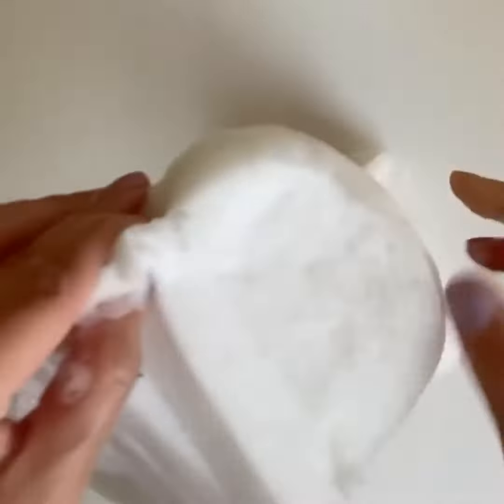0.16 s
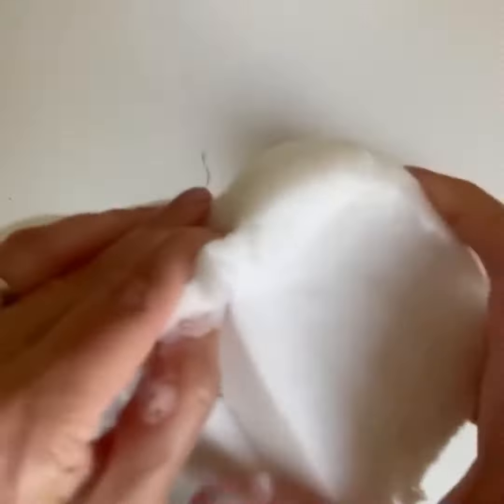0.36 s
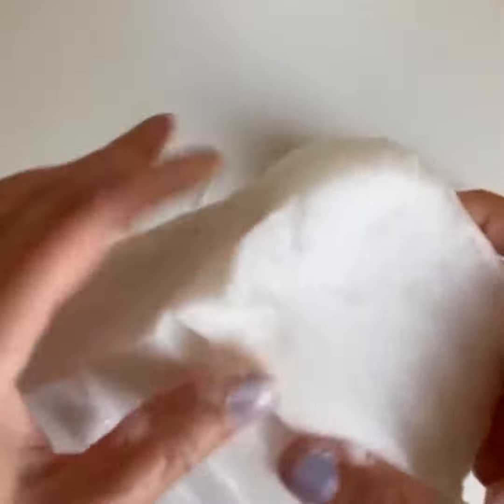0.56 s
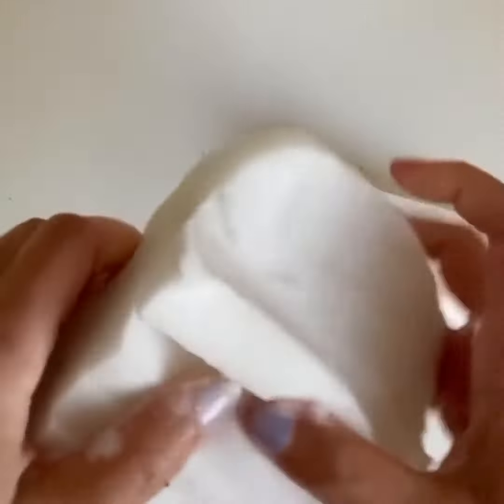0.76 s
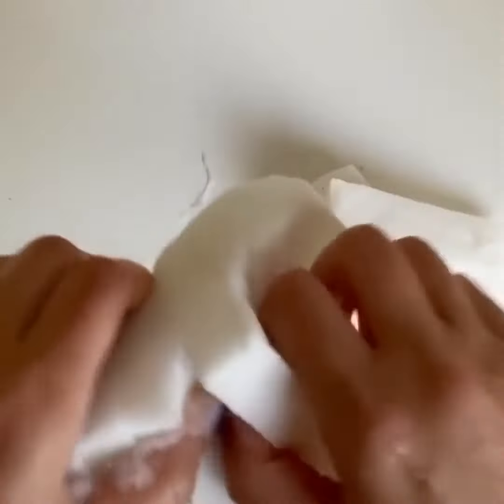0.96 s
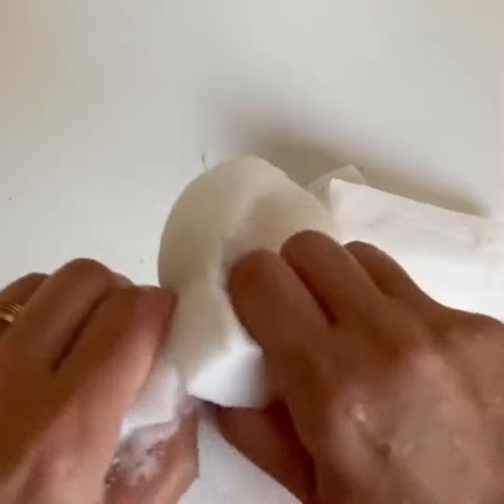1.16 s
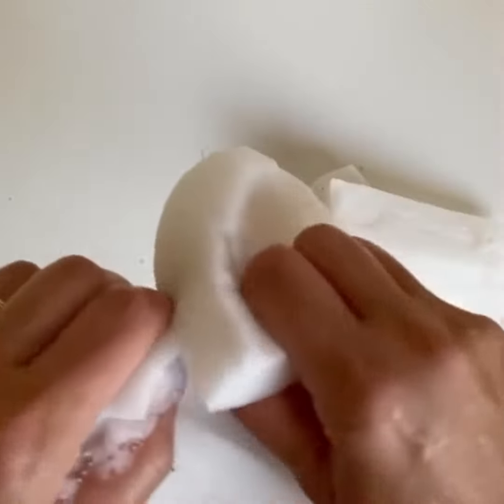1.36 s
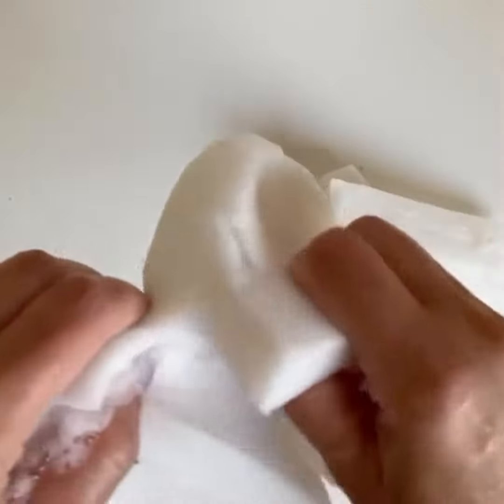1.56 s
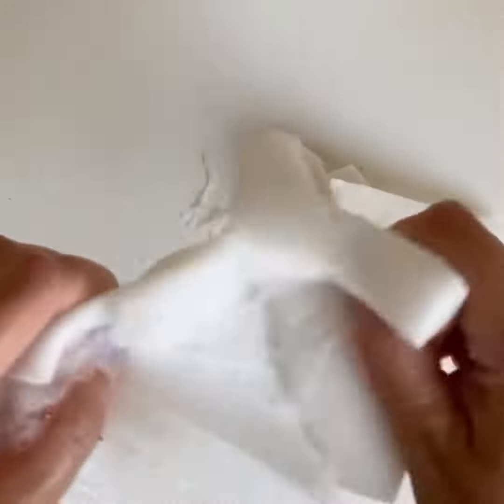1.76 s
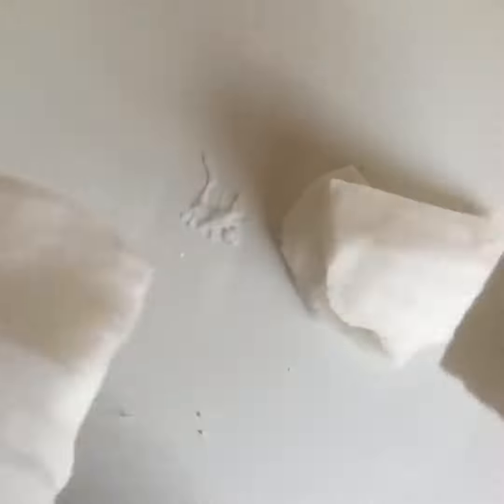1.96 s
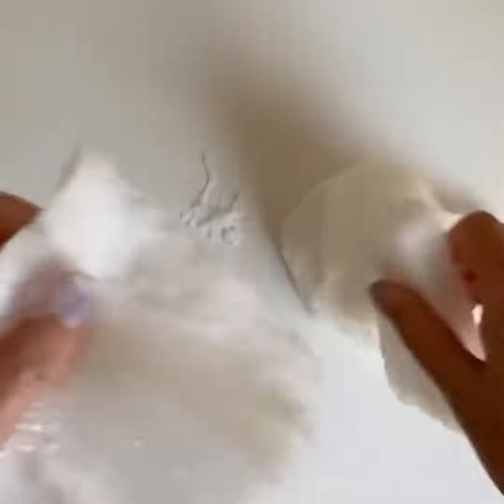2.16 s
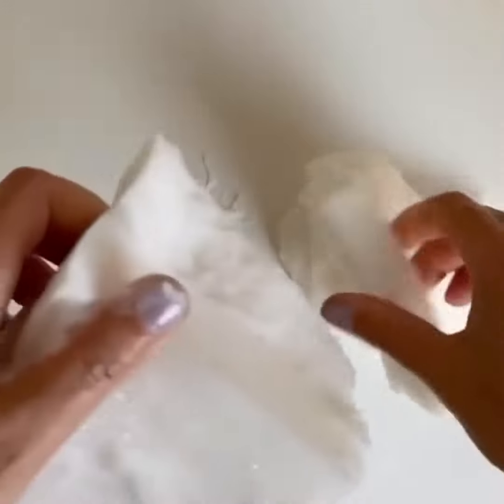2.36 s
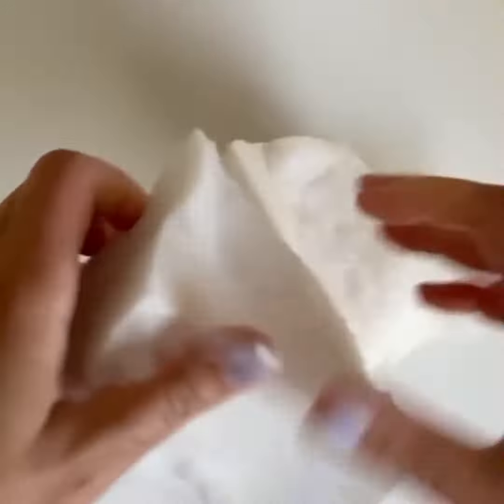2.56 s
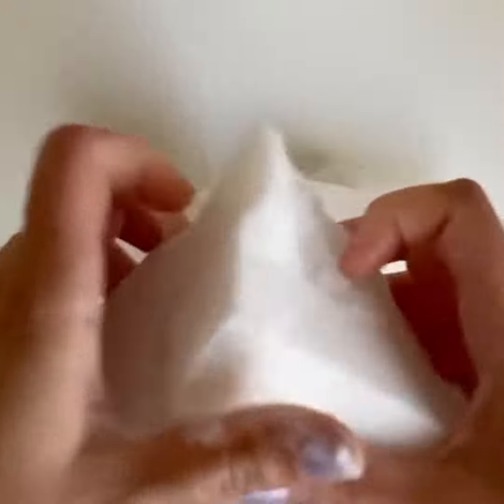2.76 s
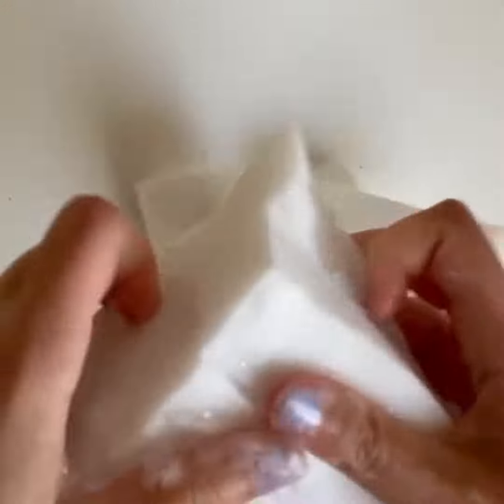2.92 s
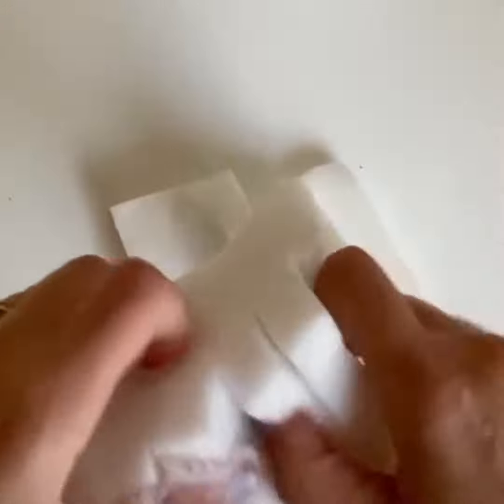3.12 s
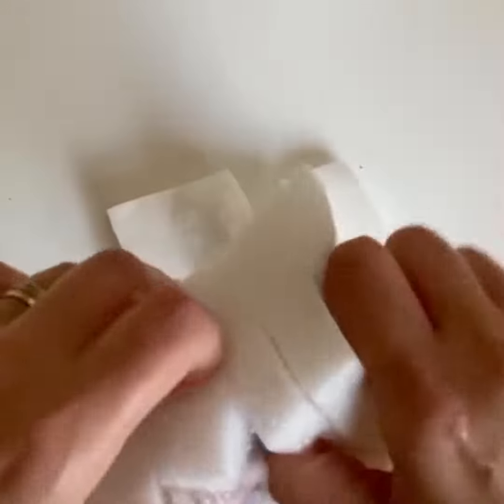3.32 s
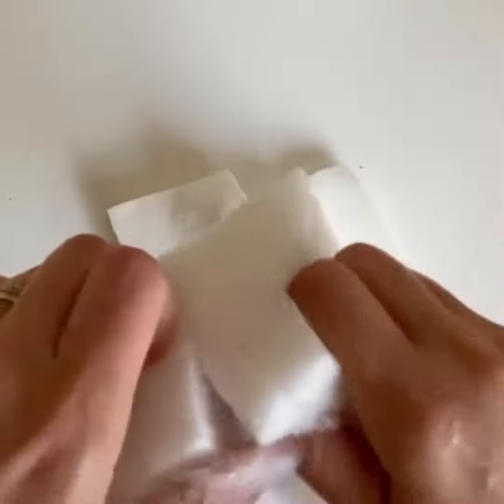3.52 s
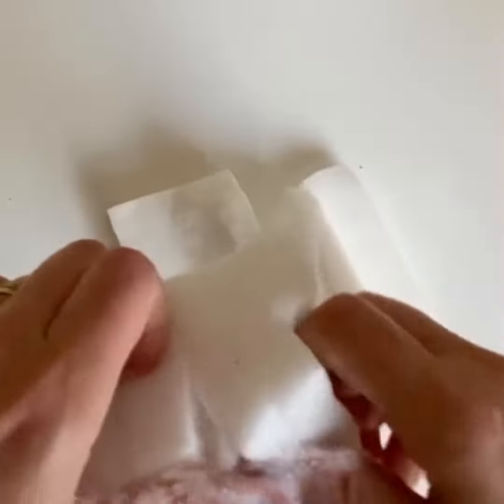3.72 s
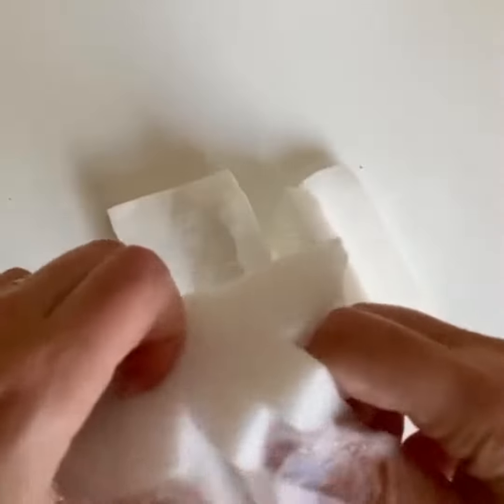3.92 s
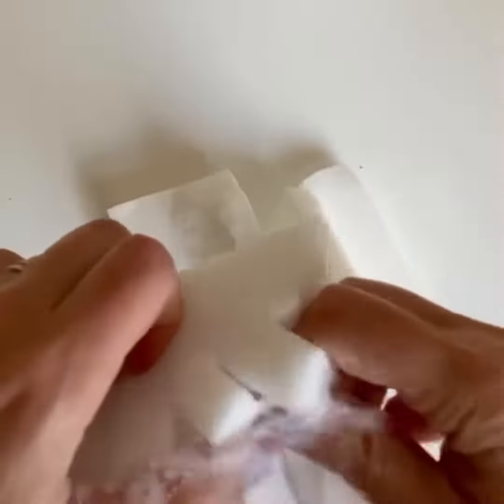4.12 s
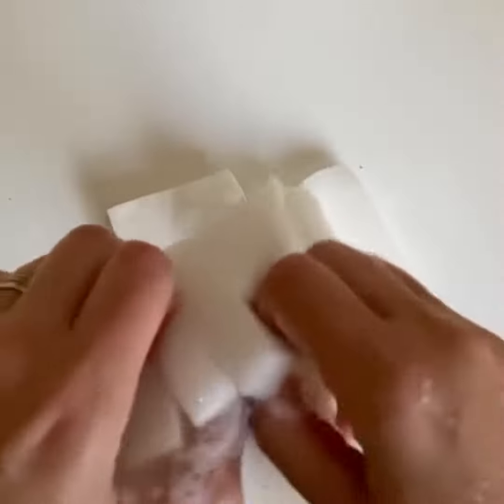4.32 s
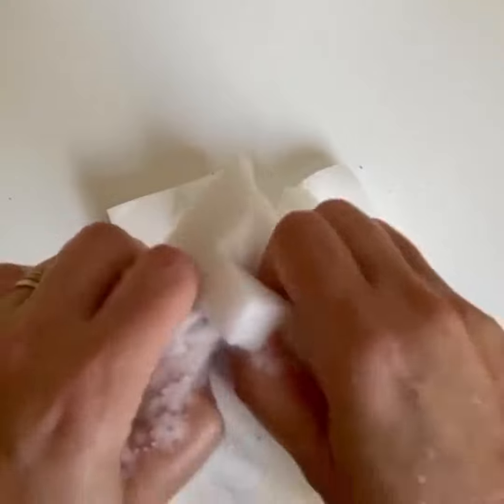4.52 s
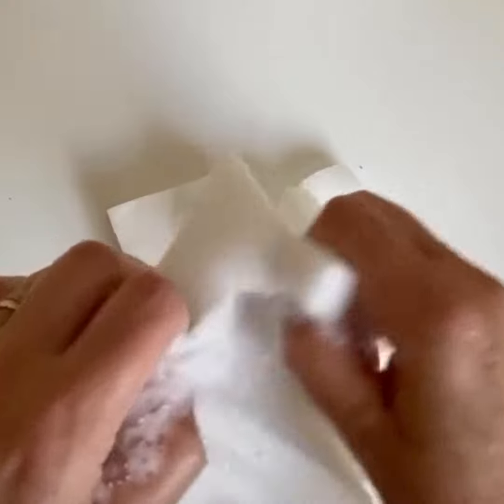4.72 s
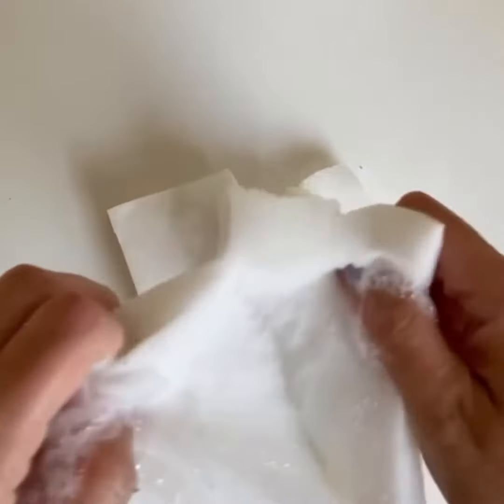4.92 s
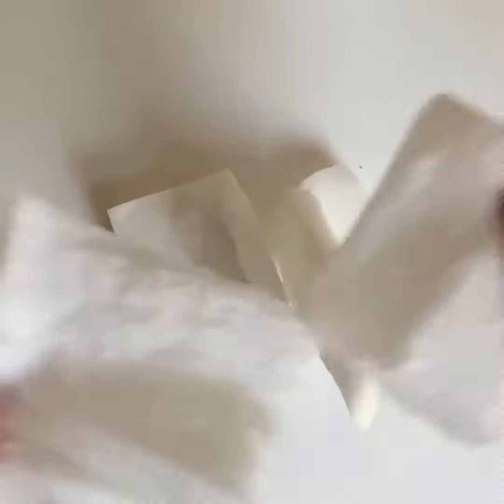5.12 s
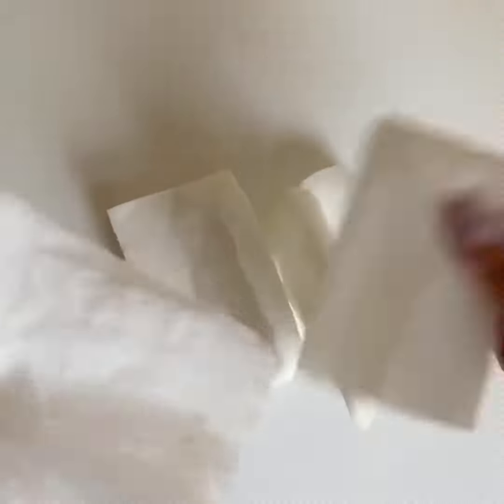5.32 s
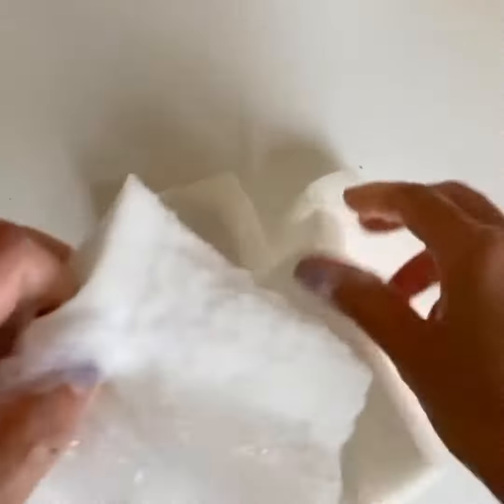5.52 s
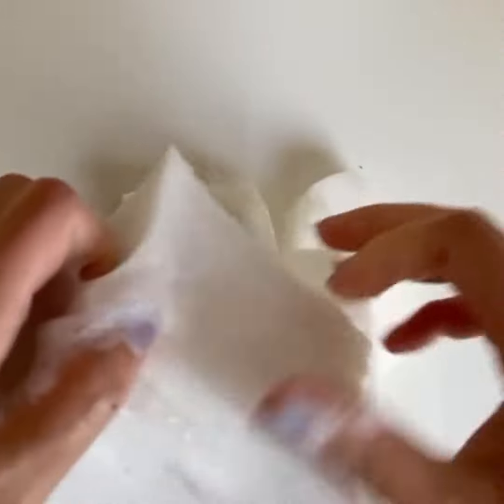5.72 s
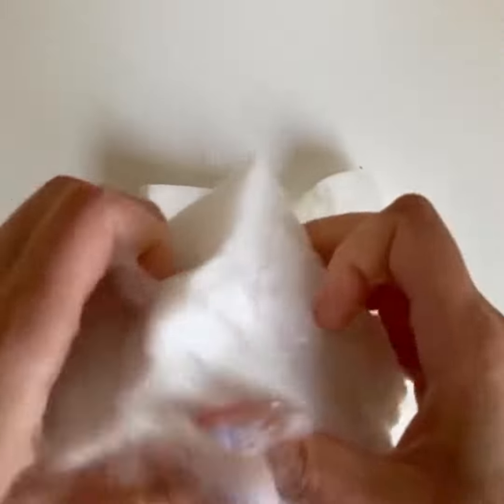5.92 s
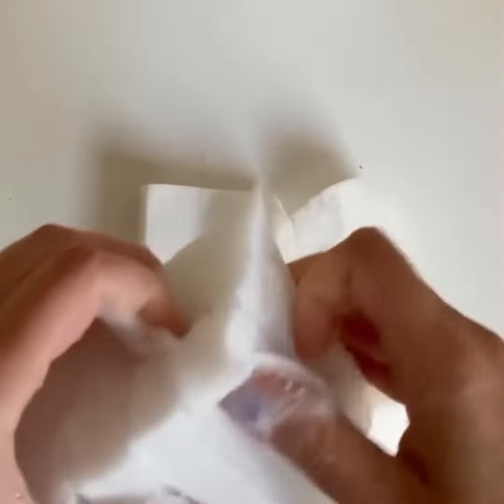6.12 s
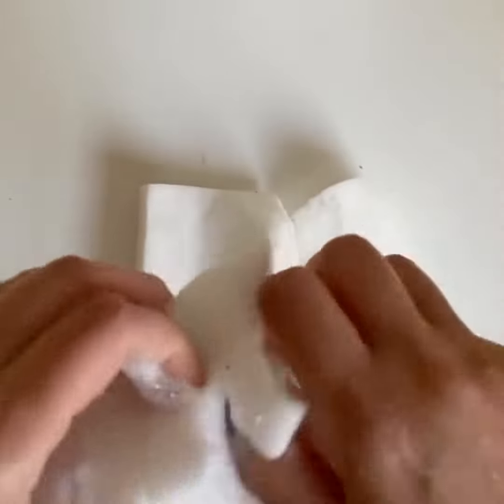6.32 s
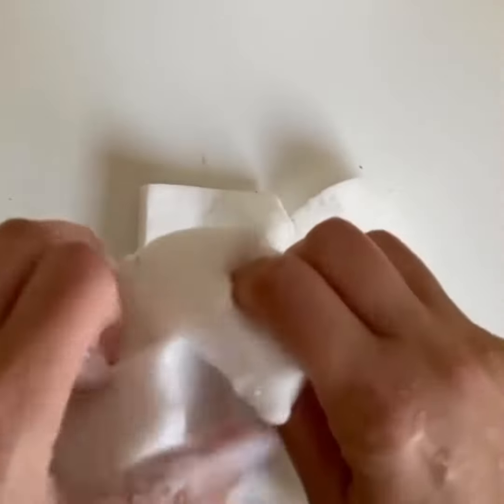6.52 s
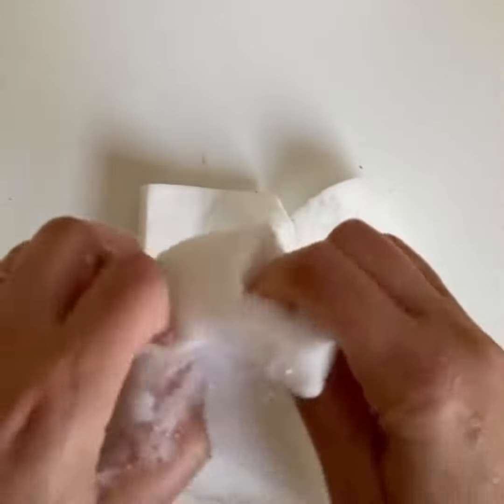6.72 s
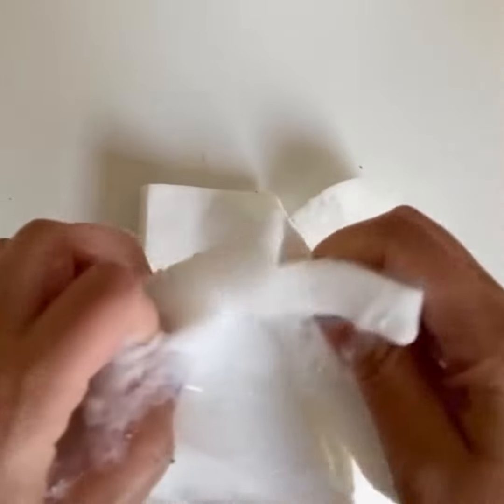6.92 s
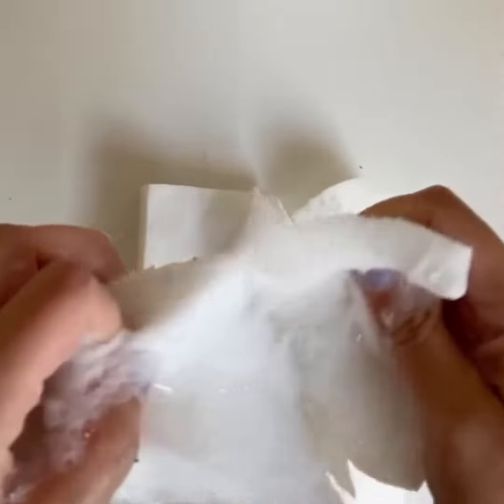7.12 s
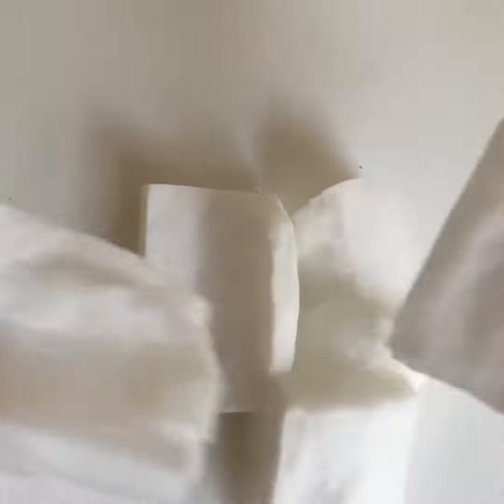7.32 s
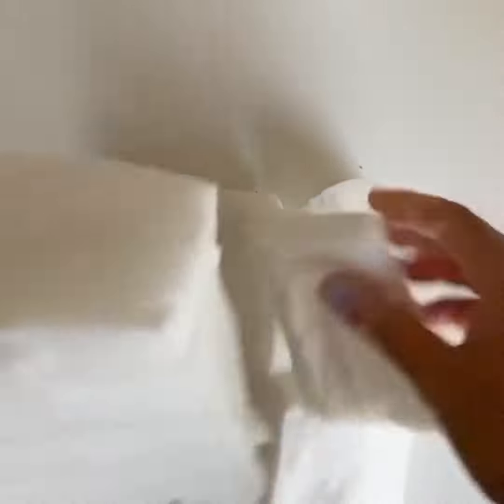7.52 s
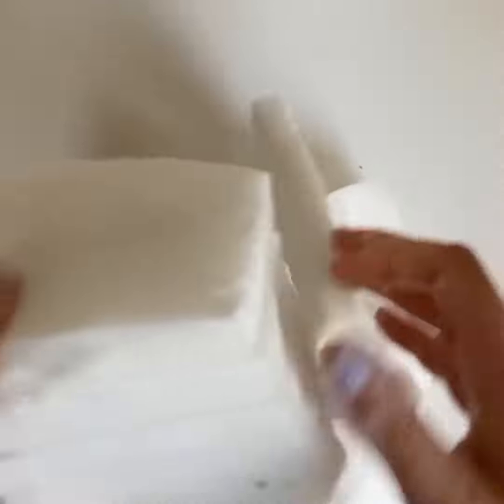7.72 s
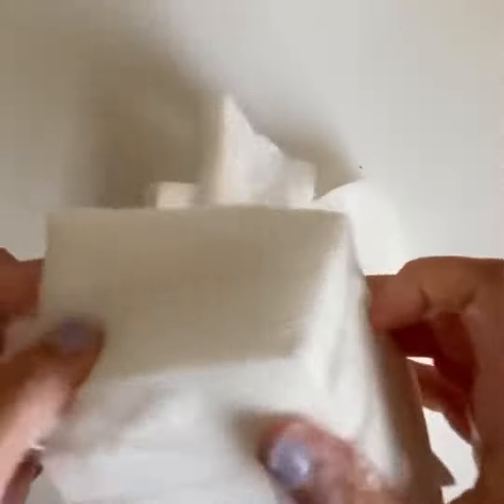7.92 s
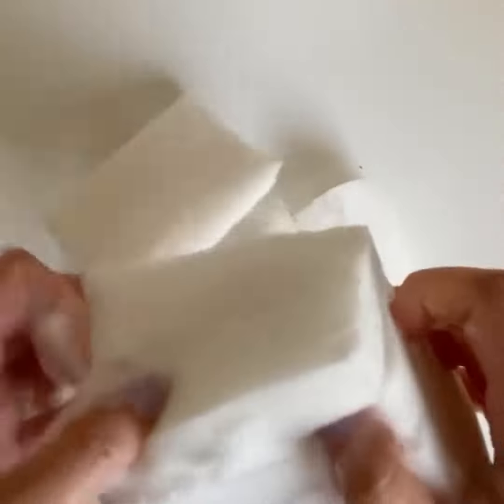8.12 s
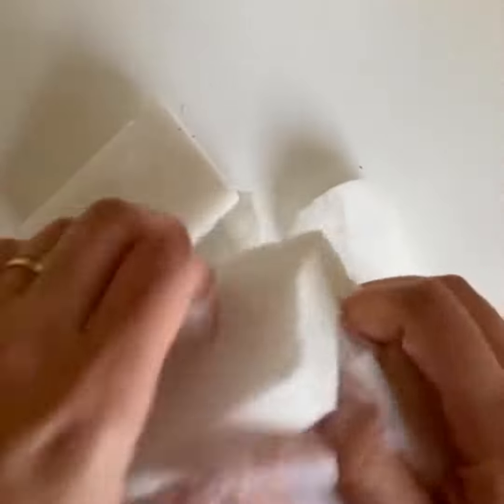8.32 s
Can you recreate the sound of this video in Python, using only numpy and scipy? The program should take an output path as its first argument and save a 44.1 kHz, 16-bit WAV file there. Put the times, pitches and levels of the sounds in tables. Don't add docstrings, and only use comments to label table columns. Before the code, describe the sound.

Close, crunchy handling of a soapy sponge in a quiet room, with three straining pulls that each end in a fast tearing snap.

```python
import sys
import numpy as np
from scipy import signal
from scipy.fft import rfft, irfft, next_fast_len
from scipy.io import wavfile
from scipy.ndimage import uniform_filter1d, map_coordinates

SR = 44100
rng = np.random.default_rng(int(sys.argv[2]) if len(sys.argv) > 2 else 0)


def volts(x):
    e = np.asarray(x, float) / 20
    return 10 ** e


def master_out(mix):
    frames = np.transpose(np.atleast_2d(mix))
    ceiling = np.clip(frames, -1, 1)
    pcm = np.round(ceiling * 32767).astype(np.int16)
    wavfile.write(sys.argv[1], SR, pcm)


N = 369116
STEP_S = .001

# start t/s, peak t/s, parting t/s, peak level/dB, wetness/dB
RIP_EVENTS = [
    (1.612, 1.624, 1.662, -15.5, 4),
    (4.837, 4.896, 4.909, -17, 4),
    (6.991, 7.059, 7.06, -13.5, -0.5),
]


def unit(x):
    return x / np.sqrt(np.mean(x ** 2) + 1e-20)


def along(points, hz):
    f, v = np.transpose(points)
    return np.interp(np.log(hz + 1), np.log(f + 1), v)


def wobble(rate):
    knots = rng.standard_normal(int(N * rate / SR) + 4)
    return map_coordinates(knots, [np.arange(N) * rate / SR])


def filtered(x, response):
    m = 2 * next_fast_len(N // 2 + 4096)
    return irfft(rfft(x, m) * response(np.fft.rfftfreq(m, 1 / SR)), m)[..., :N]


def clock():
    return np.arange(0, N / SR, STEP_S)


def per_sample(control):
    return np.interp(np.arange(N) / SR, clock(), control)


def bumps(rows, height):
    t = clock()
    return per_sample(sum(height(v) * np.exp(-((t - s) / half) ** 4) for s, v, half in rows))


def curve(rows):
    s, effort_db, wet_db = np.transpose(rows)
    effort = np.interp(clock(), s, effort_db, left=-120, right=-120)
    return effort, np.interp(clock(), s, wet_db)


def swell(s, db, rise, fade, wet_db, hold=0):
    blunt = 0.22
    t = clock() - s
    before = -t / max(rise, STEP_S)
    after = (t - hold) / max(fade, STEP_S)
    away = np.maximum(np.maximum(before, after), 0)
    return db - 10 * (np.hypot(away, blunt) - blunt), wet_db + 0 * t


def room():
    # f/Hz, level/dB per Hz
    rumble_colour = [(15, -50), (30, -14.5), (45, -8.5), (65, 7), (85, -2), (130, -5.5), (220, -43.5)]
    hiss_colour = [(80, -16), (150, 4.5), (330, 2), (600, -4.5), (2000, -16), (3400, -29), (6000, -59),
                   (9000, -45), (12500, -48), (16000, -34.5)]
    # t/s, change/dB, half length/s
    leans = [(.25, 5.5, .08), (.44, 4.5, 0.035), (1.1, 2.5, .1), (2.25, -3, 0.13), (2.6, 6, 0.052),
             (4.2, 1.5, 0.035), (5.24, 3.5, 0.053), (5.48, 4.5, .08), (5.83, 5, 0.046), (7.3, -5, 0.049),
             (7.5, -5.5, 0.052), (8.3, 3, 0.13)]
    # t/s, change/dB, half length/s
    lulls = [
        (.04, -3.5, 0.064),
        (2.28, -1.5, 0.076),
        (5.4, 0.5, 0.084),
        (7.48, -3, 0.095),
    ]
    gust_over_rip_db = [-10, -24, -21.5]
    gusts = sum(volts(db + gust_db) for (db, _), gust_db in zip(rips(), gust_over_rip_db))
    gusts = uniform_filter1d(gusts, size=40)
    hum = unit(filtered(rng.standard_normal((2, N)), lambda hz: volts(along(rumble_colour, hz))))
    hiss = unit(filtered(rng.standard_normal((2, N)), lambda hz: volts(along(hiss_colour, hz))))
    stirred = filtered(per_sample(gusts) * hum, lambda hz: hz ** 4 / (hz ** 4 + 49.0 ** 4))
    hum_gain = volts(-51.5 + bumps(leans, float) + wobble(5))
    hiss_gain = volts(bumps(lulls, float) - 56.5 + 0.77 * wobble(6.1))
    return hum_gain * hum + stirred + hiss_gain * hiss


def seeping():
    # t/s, effort level/dB, wetness/dB
    seep = [(0, -61, 2), (.09, -75, -1), (.12, -54.5, 0.5), (.82, -58.5, 3.5), (1.74, -50.5, 1),
            (2.1, -57.5, 2), (2.23, -62.5, 3), (2.44, -59, 5), (2.52, -60, -19), (3.15, -58, -3),
            (3.46, -52.5, -0.5), (4.15, -61, 3), (5.28, -53, 4.5), (5.32, -67, -3), (5.53, -60.5, 1.5),
            (7.16, -53, 6), (7.36, -63.5, 3), (8.1, -50.5, 2)]
    return [curve(seep)]


def rings(events, attack, crack):
    out, t = np.zeros(N + SR), np.arange(SR // 4) / SR
    for s, db, hz, t60 in events:
        swing = np.sin(2 * np.pi * hz * t) + crack * rng.standard_normal(len(t))
        envelope = volts(db - 60 * t / max(t60, .002)) * (1 - np.exp(-t / attack))
        out[round(s * SR):][:len(t)] += envelope * swing
    return out[:N]


def loud_snaps():
    # t/s, peak level/dB, pitch f/Hz
    snaps = [(0.105, -43, 993), (0.797, -32.5, 1420), (0.996, -28, 2400), (1.486, -15.5, 1880),
             (1.539, -25, 2070), (1.616, -9, 2570), (1.63, -3.5, 3060), (2.451, -42, 1380),
             (2.564, -43, 2000), (2.677, -26.5, 1100), (2.69, -29, 1430), (3.062, -35, 1940),
             (3.084, -29, 2420), (3.177, -42, 1220), (4.354, -22, 2880), (4.489, -16.5, 3170),
             (4.57, -10, 1140), (4.66, -15, 1890), (4.751, -20, 1900), (4.847, -15.5, 3310),
             (5.453, -51, 900), (5.911, -28, 1190), (5.981, -27.5, 2410), (6.112, -27.5, 1100),
             (6.554, -19.5, 5700), (6.869, -11, 2360), (6.996, -7, 2260), (7.554, -44, 5470)]
    t60_s = 0.0095
    return volts(3.5) * rings([(*row, t60_s) for row in snaps], attack=0.00046, crack=0.23)


def film_pops():
    # t/s, effort level/dB
    pops = [(0.108, -49), (.797, -52.5), (2.454, -39), (2.565, -44), (3.063, -46), (4.662, -24),
            (5.409, -51), (5.424, -57), (5.454, -49.5), (5.522, -56), (6.115, -39), (7.554, -52)]
    return [swell(s, db, rise=0.00073, fade=0.0019, wet_db=1) for s, db in pops]


def pinches():
    # t/s, effort level/dB, time to fade 10 dB/s, wetness/dB
    grips = [(.12, -54, .06, 5), (2.169, -58, 0, 13), (2.365, -48, -0.1, -2), (2.46, -47, 0.07, -2),
             (2.686, -41.5, 0.06, -1), (2.925, -39.5, 0.01, 0.5), (3.34, -44, -0.06, -15),
             (3.56, -54, 0.3, -0.5), (7.345, -51.5, -0.1, 7), (2.81, -47, 0.2, -2), (4.199, -41.5, .03, -1),
             (5.08, -52.5, 0.1, -13), (5.275, -54.5, 0.1, -8), (5.74, -50.5, 0.85, -7),
             (7.42, -52, -0.33, -12), (7.56, -64, 3, 6)]
    return [swell(s, db, 0.011, fade, wet) for s, db, fade, wet in grips]


def held_squeezes():
    squeezes = [(0.238, 0.308, -49, 2.5), (0.352, 0.483, -57.5, 2), (0.54, .66, -48, -3),
                (0.71, 0.78, -46.5, -1.5), (0.91, 0.971, -53, -1), (2.563, 2.656, -48.5, -0.5),
                (2.77, 2.934, -47, 0), (2.948, 3.01, -46, -2), (3.084, 3.102, -44.5, -4),
                (3.2, 3.259, -41.5, -0.5), (3.364, 3.416, -52.5, 3), (3.66, 3.767, -49, 0.5),
                (3.867, 3.882, -44, -4), (3.95, 4.122, -48, -1), (4.21, 4.31, -47, 0.5),
                (5.61, 5.659, -45, -2.5), (5.802, 5.868, -43.5, 0), (5.905, 5.974, -45.5, -1.5),
                (5.991, 6.01, -32, -7), (6.127, 6.244, -37, -4), (6.26, 6.453, -43.5, -7.5),
                (7.232, 7.265, -47, -2.5), (7.732, 7.745, -50.5, 4), (7.825, 7.942, -42.5, -1.5),
                (7.978, 7.992, -47.5, 2), (8.141, 8.238, -43, -2), (8.297, 8.37, -39, -4)]
    press_s, let_go_s = 0.022, 0.022
    return [swell(start, db, press_s, let_go_s, wet, hold=end - start)
            for start, end, db, wet in squeezes]


def finger_rubs():
    # t/s, level/dB, half length/s
    rubs = [
        (.6, -60, 0.06),
        (3.255, -76, 0.013),
        (3.33, -65, 0.013),
        (7.43, -68.5, 0.0064),
        (7.56, -55, 0.0067),
        (7.73, -63, 0.013),
        (7.93, -71, 0.071),
    ]
    return bumps(rubs, volts)


def block_thumps():
    # t/s, peak level/dB, pitch f/Hz, time to fall 60 dB/s
    thumps = [(0.729, -37.5, 131, 0.098), (1.615, -18, 388, 0.077), (1.66, -30.5, 133, 0.077),
              (4.548, -41, 390, 0.098), (4.849, -17.5, 282, 0.064), (4.93, -44, 370, 0.078),
              (5.995, -38, 389, 0.19), (6.215, -38, 305, 0.16), (6.997, -33, 395, 0.036),
              (7.048, -43, 398, 0.067), (8.149, -33, 108, 0.073),
              (4.847, -22.5, 171, 0.049),
    ]
    return volts(3.0) * rings(thumps, attack=0.0023, crack=0)


def crack_pulls():
    # t/s, effort level/dB, wetness/dB
    pulls = [
        [(.99, -58, 4.5), (1.01, -37, -1.5), (1.112, -41, -6.5), (1.164, -41, 0), (1.25, -35, -0.5),
         (1.438, -36, 1), (1.538, -21, 0), (1.58, -27.5, 4), (1.612, -29.5, 2)],
        [(4.335, -50, -2), (4.357, -37.5, -6), (4.458, -33, 1.5), (4.564, -21.5, -1.5), (4.65, -36, 2),
         (4.66, -25, -3.5), (4.702, -29, 1), (4.78, -29.5, 2), (4.845, -32.5, 5)],
        [(6.4, -51.5, 6.5), (6.506, -34.5, 2), (6.57, -33, 3), (6.58, -27, 1), (6.654, -31, 2.5),
         (6.864, -27, 2.5), (6.954, -28.5, 2), (6.992, -24.5, 2)],
    ]
    return [curve(pull) for pull in pulls]


def rips():
    start_under_peak_db, sag_db_per_s = [-10, -11, -7.5], 69
    fall_db_per_s, parted_db = [808, 347, 712], -37
    for (start, peak, parting, db, wet_db), start_db, fall in zip(RIP_EVENTS, start_under_peak_db, fall_db_per_s):
        sagged_db = db - sag_db_per_s * (parting - peak)
        yield curve([(start, db + start_db, wet_db), (peak, db, wet_db), (parting, sagged_db, wet_db),
                     (parting - parted_db / fall, sagged_db + parted_db, wet_db)])


def springing_back():
    under_rip_db = [-26, -13, -26.5]
    return [swell(parting + 0.023, db + under_db, rise=0.022, fade=0.043, wet_db=-4.5)
            for (_, _, parting, db, _), under_db in zip(RIP_EVENTS, under_rip_db)]


def cell_power(effort_db, wet_db, big_db):
    big = big_db + 0.076 * wet_db
    main = 0 * wet_db
    fine = -4.5 + wet_db
    finest = -9 + 1.48 * wet_db
    return volts(2 * (effort_db + np.array([big, main, fine, finest])))


def gestures():
    big_over_main = {"seep": -10.5, "hands": -9, "pull": -12.5, "rip": -8, "settle": 2.5}
    hands = pinches() + held_squeezes() + film_pops()
    kinds = {"seep": seeping(), "hands": hands, "rip": rips(), "settle": springing_back()}
    power = 0
    for kind, group in kinds.items():
        for effort_db, wet_db in group:
            power = power + cell_power(effort_db, wet_db, big_over_main[kind])
    crack_width_db = [2, -1, -2.5]
    for (effort_db, wet_db), width_db in zip(crack_pulls(), crack_width_db):
        big_db = big_over_main["pull"] + width_db + 0.41 * (effort_db + 30)
        power = power + cell_power(effort_db, wet_db, big_db)
    return np.array([per_sample(gain) for gain in np.sqrt(power)]) + finger_rubs()


def slips(rate, settle):
    gives = (rng.random(N) < rate / SR) * rng.exponential(size=N)
    slip = signal.lfilter([1], [1, -np.exp(-1 / (settle * SR))], gives)
    return unit(slip - slip.mean())


def crackle(spectrum, rate, spread_db, hiss, patchy_db):
    chance = rng.random((2, N))
    size = rng.exponential(size=(2, N))
    noise = rng.standard_normal((2, N))
    breaks = (chance < rate / SR) * volts(spread_db * np.minimum(size, 4)) * np.sign(noise[::-1])
    hz, _, z = signal.stft(unit(breaks) + hiss * noise, SR, nperseg=512)
    field = uniform_filter1d(rng.standard_normal(z.shape[1:]), size=5, axis=0)
    field = uniform_filter1d(field, size=7, axis=1)
    coloured = z * volts(patchy_db * unit(field) + along(spectrum, hz)[:, None])
    return unit(signal.istft(coloured, nperseg=512)[1][:, :N])


def tearing():
    # f/Hz, level/dB per Hz
    big_colour = [(90, -7), (200, -4.5), (380, 1.5), (550, -3), (800, 0.5), (1100, -1), (1600, -41.5)]
    main_colour = [(600, -41), (900, -6.5), (1200, -2.5), (1700, -1), (2500, -1.5), (2850, -4.5),
                   (3600, -8.5), (4400, -25.5), (5200, -56)]
    fine_colour = [(3000, -56), (3800, -9), (5000, -6), (6200, -5), (7200, -5.5), (8000, 0.5), (9000, -63)]
    finest_colour = [(7000, -48), (8000, -4), (8900, -0.5), (10200, -4), (12000, -8.5), (13200, -6.5),
                     (14200, -18), (15600, 0), (16200, -62)]
    big, main, fine, finest = gestures()
    jerk = 0.8 * slips(45, settle=0.018) + 0.87 * slips(200, settle=0.0039)
    body = volts(1.72 * jerk + 0.57 * wobble(25))
    body = body * crackle(big_colour, 750, spread_db=2.0, hiss=0.71, patchy_db=1.0)
    cells = volts(-1.7 + 0.4 * jerk + 1.43 * wobble(40))
    cells = cells * crackle(main_colour, 2670, spread_db=3.5, hiss=0.69, patchy_db=0.38)
    fizz = volts(0.5 + 0.85 * jerk + 0.76 * wobble(40))
    fizz = fizz * crackle(fine_colour, 4000, spread_db=2.5, hiss=0.77, patchy_db=1.24)
    air = volts(3 + 1.1 * jerk + wobble(40))
    air = air * crackle(finest_colour, 6000, spread_db=2.5, hiss=1.0, patchy_db=1.6)
    return big * body + main * cells + fine * fizz + finest * air


def echoes(hz, wet_db, t60):
    t = np.arange(8000) / SR
    tail = rng.standard_normal(len(t)) * volts(-60 * t / t60) * (t > .001)
    return 1 + volts(wet_db) * rfft(tail / np.linalg.norm(tail), 2 * (len(hz) - 1))


def ports(pair, turns):
    # f/Hz, half phase turn/rad
    paths = [(8750, 1.9), (9900, 2.72), (11200, 2.97), (12400, 3.45), (13500, 4.4), (15150, 4.97),
             (15500, 5.17), (16000, 5.1)]
    # f/Hz, share/0-1
    tied = [(100, .2), (1500, .3), (4000, .45), (6500, .6), (9200, .7), (10500, .3), (15000, .4)]
    turn = lambda hz: along(turns + paths, hz)
    same = lambda hz: np.clip(along(tied, hz), 0, 1)
    shares = lambda hz: np.array([same(hz), np.sqrt(1 - same(hz) ** 2)])
    mid = filtered(pair[0], lambda hz: np.cos(turn(hz)))
    side = filtered(pair, lambda hz: 1j * np.sin(turn(hz)) * shares(hz)).sum(axis=0)
    return np.array([mid + side, mid - side]) * volts([[-.15], [.15]])


def masked(x, band_db, clump_db, bin_db, moody_db):
    size, lead = 1024, 2048 - 688
    n, k = np.arange(2 * size), np.arange(size)
    window = np.sin(np.pi * (n + .5) / (2 * size))
    basis = window * np.cos(np.pi / size * np.outer(k + .5, n + .5 + size / 2)) * np.sqrt(2 / size)
    count = (N + lead) // size + 2
    halves = np.pad([x[0] + x[1], x[0] - x[1]], ((0, 0), (lead, count * size - N - lead)))
    halves = halves.reshape(2, count, size) / 2
    z = np.concatenate([halves[:, :-1], halves[:, 1:]], axis=2) @ basis.T

    def mean(width):
        power = (z ** 2).reshape(2, count - 1, -1, width).mean(axis=3)
        return np.repeat(power, width, axis=2)

    both = mean(width=16).sum(axis=0)
    mood = uniform_filter1d(rng.standard_normal((count - 1, 1)), size=3, axis=0) * np.sqrt(3)
    energy = both[:, 64:].sum(axis=1)
    loudness = energy[:, None] + 1e-12
    floor = both * volts(2 * moody_db * mood * (1 + (k > 690)))
    floor = floor * (loudness / np.median(loudness)) ** -.06
    keep = mean(width=16) > volts(2 * band_db) * floor
    keep &= mean(width=4) > volts(2 * clump_db) * floor
    keep &= z ** 2 > volts(2 * bin_db) * floor
    keep |= (energy > volts(2 * 5.5) * np.roll(energy, 1))[:, None]
    keep |= (energy < volts(2 * -9) * np.roll(energy, 1))[:, None]
    hz = (k + .5) * SR / (2 * size)
    frames = (z * (keep | (hz < 1200)) * (hz < 15950)) @ basis
    joined = (frames[:, 1:, :size] + frames[:, :-1, size:]).reshape(2, -1)
    mid, side = joined[:, lead - size:lead - size + N]
    return np.array([mid + side, mid - side])


def scene():
    # f/Hz, turn/rad
    near_turns = [(60, .05), (1400, .25), (2300, .12), (2900, .45), (4800, .46), (5300, .2), (6300, .35),
                  (7300, 1.2)]
    # f/Hz, turn/rad
    room_turns = [(60, 0.023), (300, 0.34), (700, 1), (1400, 1)]
    sponge = filtered(tearing() + loud_snaps(), lambda hz: echoes(hz, wet_db=-10.0, t60=0.088))
    return ports(sponge + block_thumps(), near_turns) + ports(room(), room_turns + near_turns[2:])


def top_cut(x):
    return signal.sosfilt(signal.butter(12, 16090, fs=SR, output="sos"), x)


def record(dry):
    rounded = dry / (1 + np.abs(dry / .9) ** 4) ** .25
    thinned = masked(rounded, band_db=-10, clump_db=-10, bin_db=-22, moody_db=1.9)
    return top_cut(thinned)


dry = scene()
out = record(dry)
master_out(out)
```